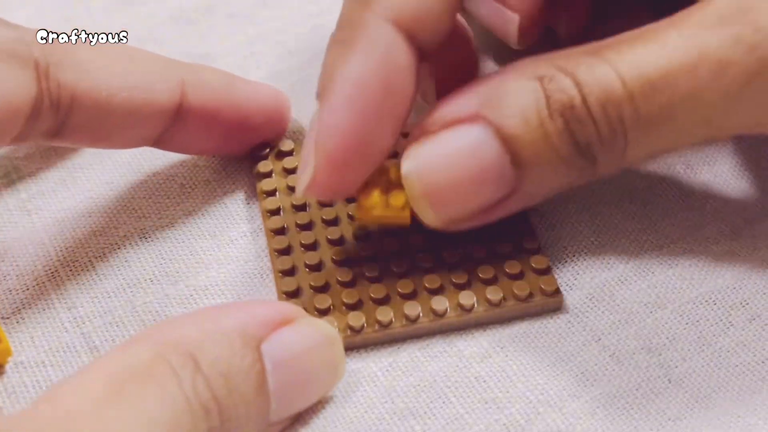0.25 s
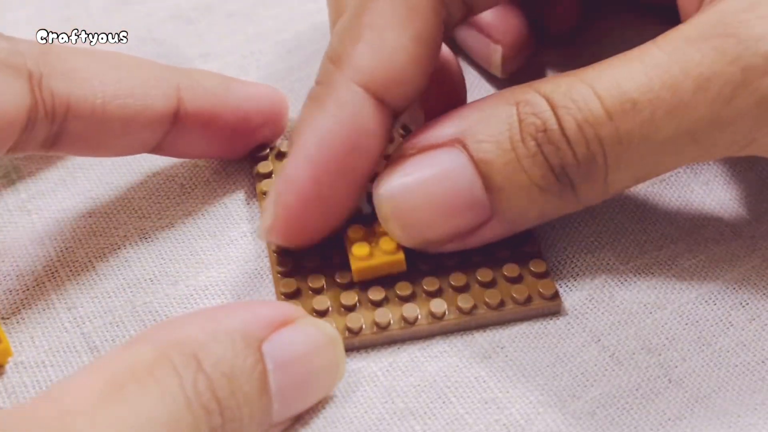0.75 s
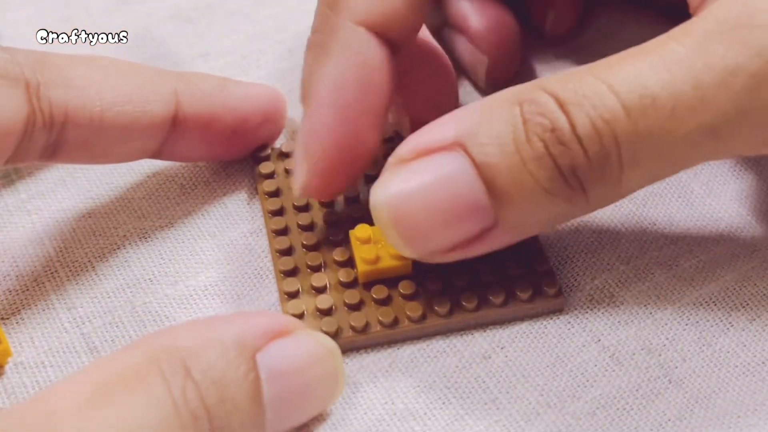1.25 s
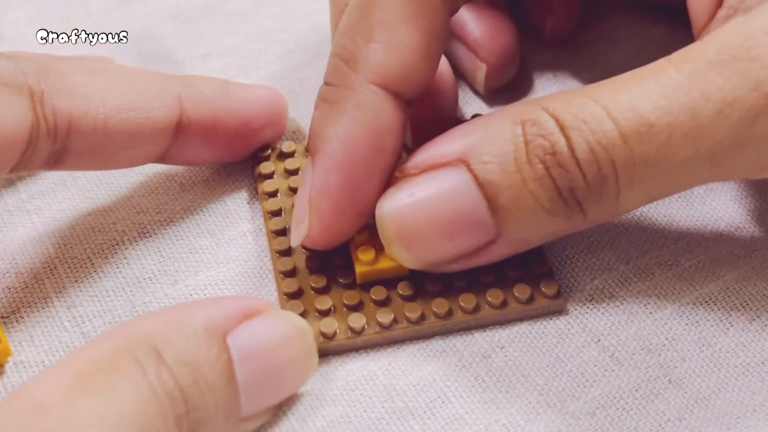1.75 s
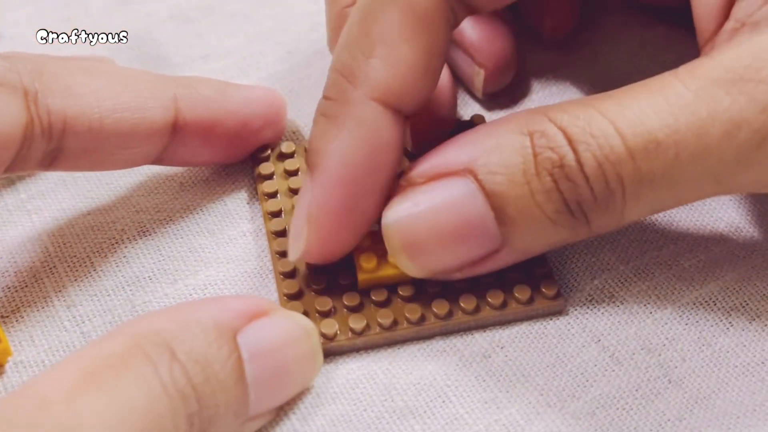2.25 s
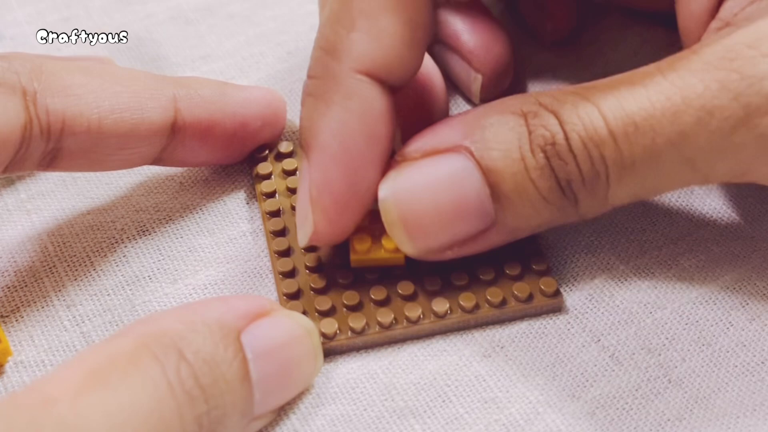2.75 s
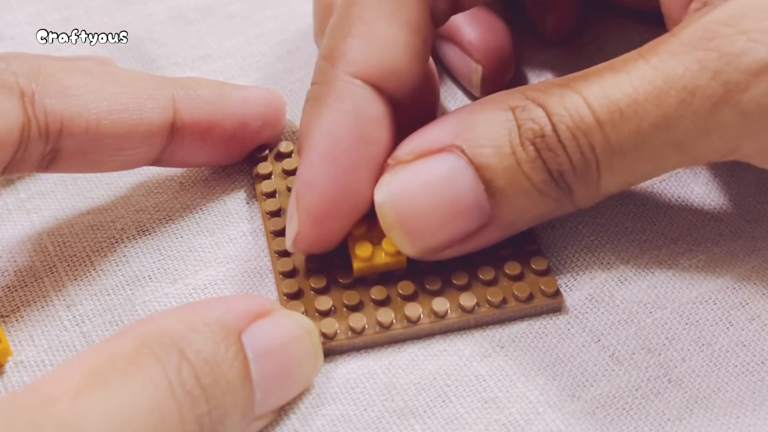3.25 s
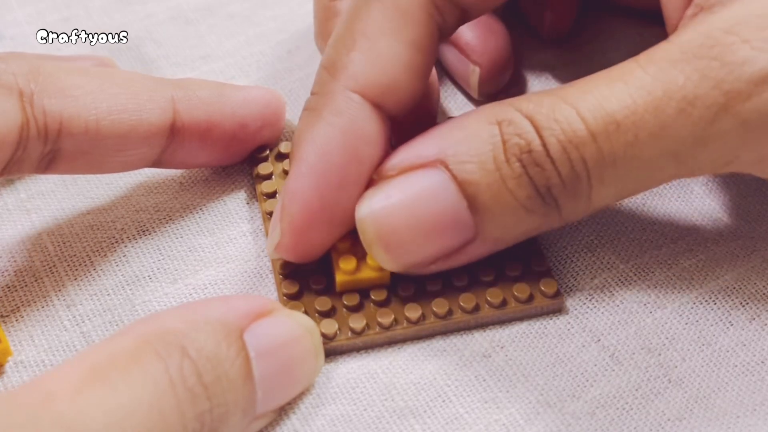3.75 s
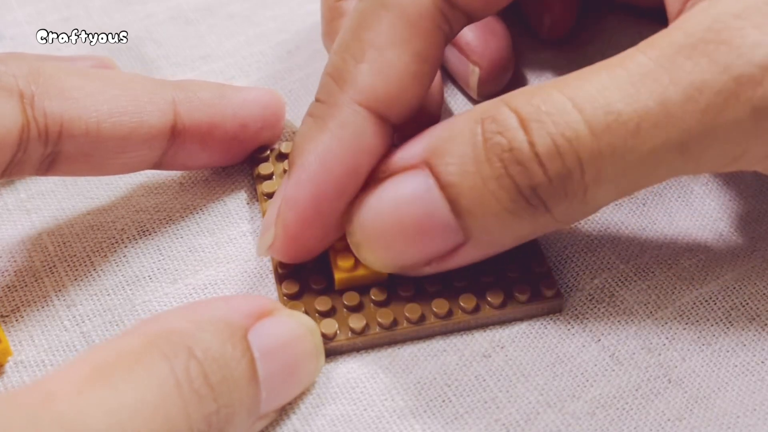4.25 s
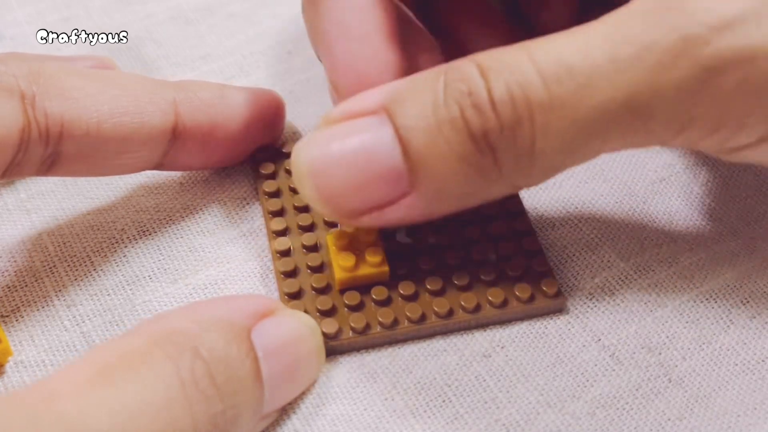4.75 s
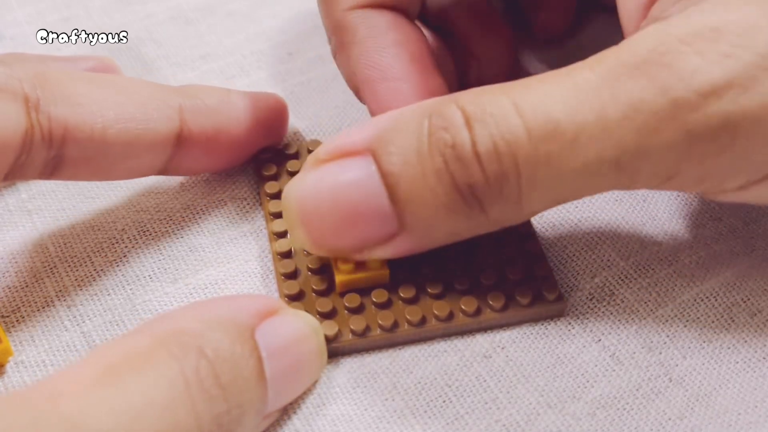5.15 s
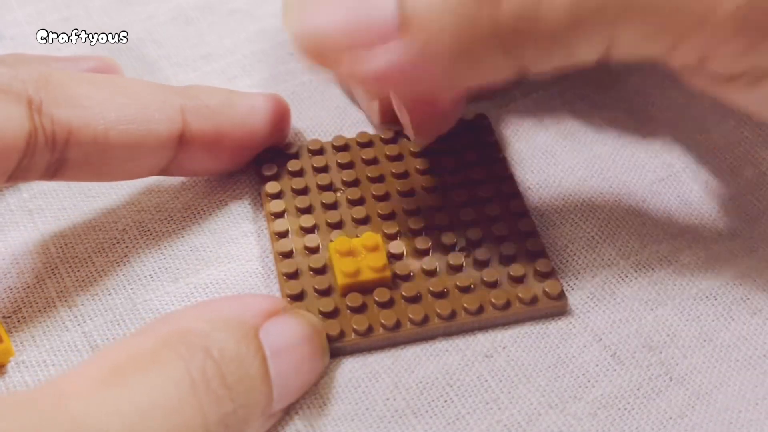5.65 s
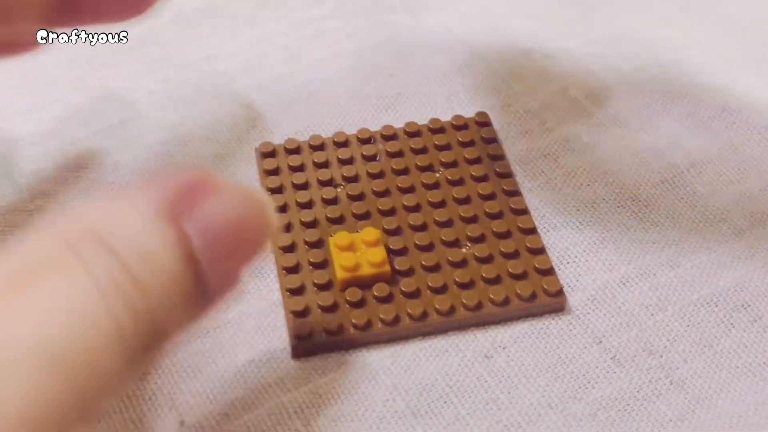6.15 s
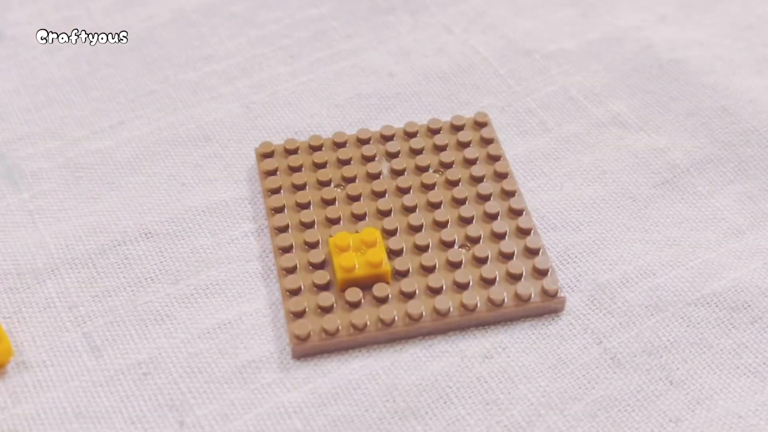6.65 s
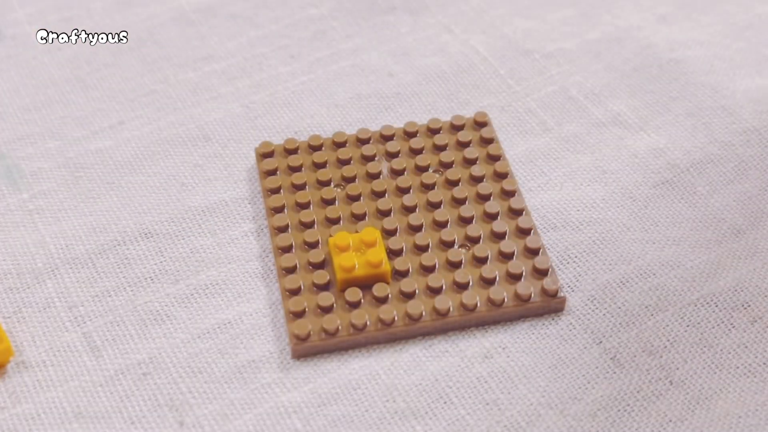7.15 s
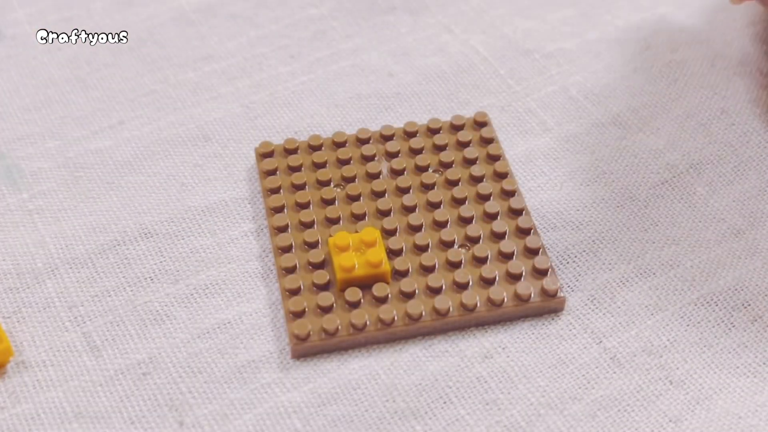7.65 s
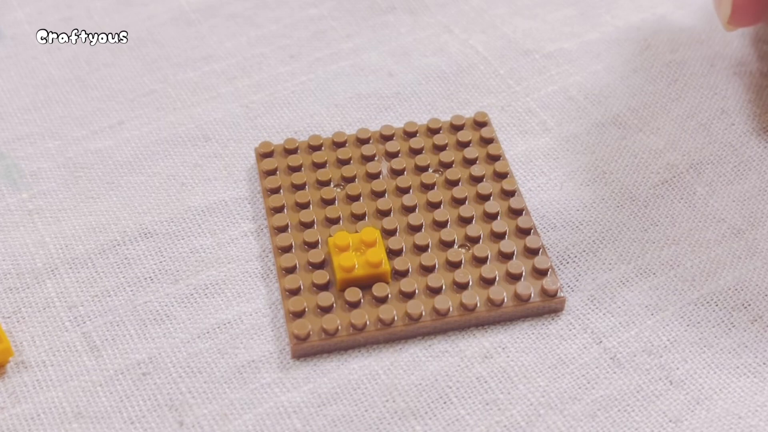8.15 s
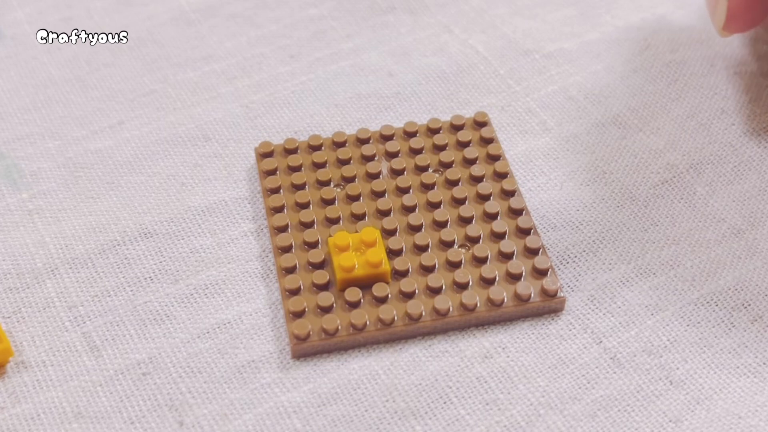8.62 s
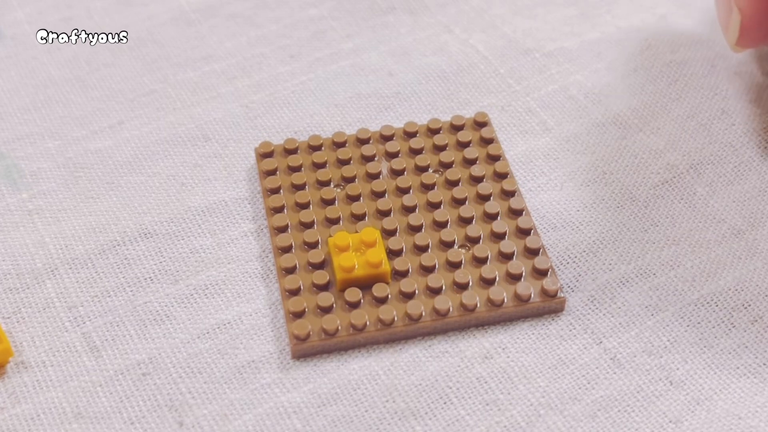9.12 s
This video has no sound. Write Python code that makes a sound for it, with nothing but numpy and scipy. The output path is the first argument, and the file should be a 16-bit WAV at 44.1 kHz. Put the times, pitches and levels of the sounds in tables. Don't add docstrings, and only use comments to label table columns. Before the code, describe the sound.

Throughout, an indoor bed of steady mains and fan hum, a faint compressor whine, slowly swelling low drones and soft ventilation rumble. At 0.05 s a soft deep table thud with a small tap and finger hiss; dry tiny plastic clicks at 0.45-0.6, then a rapid scraping stutter over studs at 0.72-0.77. At 1.34 clicks with a deep push; sparse faint ticks at 2.4, 3.1 and 3.6. From 4.1 light ticks and a short low push at 4.4. At 5.02-5.23 an even, brighter ratchet of about six clicks, then firm presses and a snap to 5.4. Cloth and sleeve brushing at 5.7-6.7 with faint ticks. Mostly hum and barely audible rustle until 9.03, when a soft thud and sharp knock land, a few-millisecond dip follows at 9.14, then a crisp double snap and brief rustle at 9.23-9.3. Close, dry stereo microphones.

```python
import sys
import numpy as np
from scipy import signal
from scipy.fft import rfft, irfft, next_fast_len
from scipy.io import wavfile
from scipy.ndimage import uniform_filter1d

SR = 44100
rng = np.random.default_rng(int(sys.argv[2]) if len(sys.argv) > 2 else 0)


def voltage_ratio(level):
    return 10 ** (np.asarray(level, float) / 20)


def unload_audio(sound):
    columns = np.transpose(np.atleast_2d(sound))
    steps = np.round(np.clip(columns, -1, 1) * 32767)
    wavfile.write(sys.argv[1], SR, steps.astype(np.int16))


N = 413658
TIME = np.arange(N) / SR
M = next_fast_len(N)
HZ = np.fft.rfftfreq(M, 1 / SR)

# f/Hz, lead/rad
PORT_LEAD = [(0, 0), (340, .35), (690, 2.5), (1210, 3), (1720, 6.6), (3200, 7.3), (4500, 6.9), (7500, 3.9),
             (8600, 3.0), (11000, .4), (13000, -.5), (15000, -3)]
# f/Hz, left minus right/dB
PORT_TILT = [(60, 1.5), (200, 2), (400, -2.5), (700, 4), (1300, -1), (2400, 6), (4400, 10), (7500, 1),
             (15000, 1)]


def along(table):
    f, v = np.transpose(table)
    return np.interp(np.log(HZ + 1), np.log(f + 1), v)


def noise(colour):
    return irfft(rfft(rng.standard_normal(M)) * voltage_ratio(along(colour)), M)[:N] * np.sqrt(SR / 2)


def ports(x):
    half = voltage_ratio(along(PORT_TILT) / 2) * np.exp(.5j * along(PORT_LEAD))
    return irfft(rfft(x, M) * np.array([half, 1 / half]), M)[:, :N]


def walk(rate_hz):
    k = int(SR / rate_hz)
    steps = np.repeat(rng.standard_normal(N // k + 1), k)
    return 0.66 * uniform_filter1d(uniform_filter1d(steps, k), k)[:N]


def ring(push, hz, t60_s):
    pole = np.exp(2j * np.pi * hz / SR - np.log(1000) / (t60_s * SR))
    y = signal.lfilter([1], [1, -pole], push).imag
    return y / np.abs(y).max()


def add(out, s, x):
    i = int(s * SR)
    out[i:i + len(x)] += x[:N - i]


def contacts():
    # t/s, peak level/dB, brick ring f/Hz, stud level/dB, edge level/dB
    settles = [(0.4471, -37, 3250, -16, -24), (0.5606, -51, 3400, -5, -14), (0.5765, -41, 3300, -18, -25),
               (.5828, -41.5, 3250, -13, -20), (0.5914, -57, 3600, -12, -10), (1.335, -54, 2900, -24, -14),
               (1.3421, -42, 2800, -6, -13), (1.3432, -46, 3700, -8, -14), (3.6364, -42, 2960, -9, -10),
               (1.4005, -50.5, 2900, -13, -24), (2.4217, -41.5, 3150, -20, -21),
               (2.5026, -56, 3220, -20, -25), (3.0854, -55, 3250, -16, -27), (3.6225, -51, 3150, -12, -15),
               (5.8398, -53.5, 4500, -3, -20), (.612, -62, 2600, -15, -8)]
    ratchet = [(.1619, -64, 2350, -15, -2), (0.218, -68, 2300, -8, 2), (.244, -72, 2300, -14, 2),
               (.2952, -72, 2300, -14, 2), (.6562, -63.5, 3400, 2, -4), (4.0912, -48.5, 2560, -25, -10),
               (4.0948, -62, 2500, -14, -2), (4.1052, -68, 2500, -14, 4), (4.483, -72, 2500, -20, 4),
               (4.782, -58.5, 2510, -30, -17), (4.856, -72, 2500, -20, 2), (4.984, -57, 2600, -18, -10),
               (5.0243, -43.5, 2850, -26, -11), (5.0632, -34, 2970, -28, -6),
               (5.106, -36.5, 2850, -10, -4.5), (5.141, -37.5, 2800, -16, -5), (5.1814, -33, 3080, -25, -9),
               (5.2252, -37, 3400, -10, -7), (5.4865, -59, 3120, -30, -17), (5.4996, -58.5, 2990, -28, -12),
               (5.8132, -52, 2430, -12, -14), (5.9202, -56, 2890, -23, -12), (6.3922, -58, 2390, -25, -7),
               (6.6983, -59.5, 2400, -27, -14)]
    knocks = [
        (.043, -41, 2700, -30, -35),
        (5.2272, -39, 3450, -9, -18),
        (5.344, -46, 2750, -32, -36),
        (9.017, -55, 2300, -14, -30),
        (9.0453, -35, 4200, -4, -13),
        (9.0476, -44, 3900, -25, -25),
    ]
    snaps = [
        (5.3953, -42.5, 3100, -8, -10),
        (6.107, -52, 2800, -4, -8),
        (9.2268, -41, 3000, -6, -13),
        (9.2288, -48, 3000, -7, -14),
    ]
    scrapes = [(.7255, -50, 3000, -20, -24), (.7286, -46, 3100, -18, -24), (.7322, -36, 3020, -18, -15),
               (.7352, -38, 3100, -10, -8), (.7374, -41, 3100, -12, -14), (.7402, -49, 3200, -14, -14),
               (.7462, -48, 3100, -10, -20), (.7478, -48, 3100, -16, -22), (.7525, -40, 3000, -16, -26),
               (.7544, -44, 3200, -16, -22), (.758, -46, 3300, -16, -24), (.7602, -41, 3050, -15, -24),
               (.7628, -47, 3100, -14, -22), (.766, -50, 3100, -16, -22), (.772, -57, 3000, -20, -26),
               (.7745, -58, 3100, -20, -26)]
    # stud-brick ring t60/s, plate level/dB, panel f/Hz, panel level/dB
    kinds = [
        (settles, (.0055, -17, 2100, -16)),
        (ratchet, (.007, -8, 930, -11)),
        (knocks, (.007, -3, 1500, -12)),
        (snaps, (.006, -12, 1950, -5)),
        (scrapes, (.007, -18.5, 2100, -20)),
    ]
    return [(*row, *traits) for table, traits in kinds for row in table]


def ticks():
    out, knock, t = np.zeros(N), np.zeros(N), TIME[:1024]
    rows = contacts()
    chance = rng.standard_normal((len(rows), 1024 + 14))
    tiny = signal.butter(3, 4300, "high", fs=SR, output="sos")
    broad = signal.butter(3, 1800, fs=SR, output="sos")
    for (s, db, hz, stud_db, edge_db, t60_s, plate_db, panel_hz, panel_db), c in zip(rows, chance):
        push = c[14:] * t / .0004 * np.exp(-t / 0.00048) * voltage_ratio(-2.5)
        push[16] += 3.5
        small = signal.butter(4, .7 * hz, "high", fs=SR, output="sos")
        sharp = signal.sosfilt(small, push)
        w = 1 + .03 * c[:14]

        brick = ring(sharp, hz, t60_s)
        brick -= voltage_ratio(-11) * ring(sharp, .84 * hz * w[0], .004)
        brick -= voltage_ratio(-3.5) * ring(sharp, 1.22 * hz * w[1], .005)
        brick += voltage_ratio(-9) * ring(sharp, 1.45 * hz * w[12], .003)

        stud = ring(sharp, 6300 * w[2], 0.0027)
        stud += voltage_ratio(-6.0) * ring(sharp, 5100 * w[3], 0.0032)
        stud += voltage_ratio(-3.0) * ring(sharp, 7400 * w[4], 0.0014)

        edge = ring(sharp, 11600 * w[5], 0.002)
        edge += voltage_ratio(-.5) * ring(sharp, 9300 * w[6], 0.0017)
        edge += voltage_ratio(-6) * ring(sharp, 13500 * w[7], 0.0021)
        edge += voltage_ratio(-20) * ring(sharp, 15000, .001)

        plate = ring(push, 800 * w[8], 0.016) + ring(push, 1050 * w[9], 0.015)
        plate += voltage_ratio(3.5) * ring(push, 1300 * w[10], 0.009)
        plate += voltage_ratio(-5) * ring(push, 1700 * w[11], 0.036)

        crack = voltage_ratio(-11) * sharp / np.abs(sharp).max()
        treble = signal.sosfilt(tiny, voltage_ratio(stud_db + 4.5) * stud + voltage_ratio(edge_db + 4.5) * edge)
        add(out, s, voltage_ratio(db) * (voltage_ratio(-2.5) * brick + crack + treble))
        add(knock, s + 0.0013, voltage_ratio(db + plate_db - 7.5) * signal.sosfilt(broad, plate))
        add(knock, s + .0003, voltage_ratio(db + panel_db) * ring(push, panel_hz * w[13], .009))
    tail = rng.standard_normal((2, 4096)) * voltage_ratio(-60 * TIME[:4096] / .08)
    room_tail = voltage_ratio(-50) * signal.fftconvolve(out[None], tail)[:, :N]
    return ports(out) + voltage_ratio(np.array([[2.5], [-2.5]])) * knock + room_tail


def thuds():
    # t/s, peak level/dB, f/Hz, t60/s, upper-mode share/dB
    pushes = [
        (.0452, -26.5, 121.7, 0.14, -9.5),
        (.1, -27, 109.5, 0.13, -23),
        (1.343, -27.5, 61, 0.17, -17.5),
        (4.393, -32.5, 66, 0.055, -15),
        (5.228, -34, 163, 0.096, -6.5),
        (5.3462, -36, 300, .04, -2),
        (5.3485, -30.5, 112, 0.11, -1),
        (5.395, -34.5, 126.5, 0.12, -5),
        (9.026, -30.5, 68, 0.14, -28),
        (9.046, -31.5, 114, 0.047, -7),
    ]
    out, push = np.zeros(N), np.zeros(8192)
    push[:24] = -np.hanning(24)
    band = signal.butter(3, [200, 1200], "band", fs=SR, output="sos")
    rattle = signal.sosfilt(band, rng.standard_normal((len(pushes), 8192)))
    for (s, db, hz, t60_s, upper_db), shake in zip(pushes, rattle):
        upper = ring(push, 2.59 * hz, .5 * t60_s)
        upper += voltage_ratio(1.5) * ring(push, 3.33 * hz, 0.14 * t60_s)
        upper += voltage_ratio(-8) * ring(push, 4.9 * hz, 0.17 * t60_s)
        upper += voltage_ratio(-4.5) * shake * voltage_ratio(-60 * TIME[:8192] / (2.5 * t60_s))
        add(out, s, voltage_ratio(db) * (ring(push, hz, t60_s) + voltage_ratio(upper_db) * upper))
    return ports(signal.sosfilt(signal.butter(2, 45, "high", fs=SR, output="sos"), out))


def rubbing():
    # f/Hz, level/dB
    airy = [(6500, -12), (8000, -3), (9500, -4.5), (11500, -1.5), (13000, -2.5), (14500, -1.5),
            (15600, -24.5)]
    # f/Hz, level/dB
    grainy = [(1500, -18), (2700, 1), (3600, -3), (5000, -3), (6500, 0), (7500, -2), (9000, -20)]
    # t/s,
    # hold/s, level/dB, grain over hiss/dB
    strokes = [(0, 0.15, -71.5, -11), (.216, 0.017, -76, -10), (.294, 0, -78, -25), (.47, .06, -90, -8),
               (.545, .005, -84, -15), (.57, .04, -84, -7), (.658, 0.0021, -79, 0), (.71, 0, -88, -12),
               (1.005, 0.031, -82, -20), (1.574, 0, -85, -20), (1.62, 0.026, -79, -20), (2.06, .2, -91, -11),
               (2.44, 0.013, -87, -20), (2.75, 0, -92, -13), (3.06, 0.075, -99, 4), (3.326, 0, -90, -20),
               (3.41, .03, -89, -8), (3.605, 0.048, -81.5, -12), (3.829, 0.023, -92, -17),
               (4.07, .02, -80, -14), (4.316, 0, -79, -24), (4.425, .07, -83, -20), (4.53, .05, -81, -20),
               (4.615, 0.035, -77, -2), (4.69, .02, -82, -18), (4.74, 0.07, -80, -18), (4.85, 0.05, -84, -15),
               (4.935, .01, -82, -12), (4.97, .06, -88, -12), (5.258, 0.055, -75.5, -5),
               (5.33, 0.041, -78, -22), (5.446, 0.012, -82, -9), (5.492, 0.059, -84, -16),
               (5.705, 0.1, -67, -8), (5.82, 0.04, -68, -3), (5.88, .06, -68, -7), (6.07, 0.045, -80, -10),
               (6.27, 0.047, -78, -3), (6.4, 0.053, -71.5, -7), (6.55, 0.096, -77, -3.5),
               (6.62, 0, -73, -5), (7.05, 0.11, -87.5, 6), (7.24, 0.05, -85, -2), (7.44, 0.082, -85.5, -5),
               (7.66, 0.025, -87, -12), (7.81, .02, -91.5, 6), (8.22, 0, -80, -3), (8.4, 0.03, -94.5, 12),
               (9.06, 0.16, -90.5, 13), (9.155, .065, -75.5, -8), (9.27, 0.016, -64.5, -6),
               (9.33, .05, -89, 4)]
    rise_db_per_s, fall_db_per_s = 452.5, 378.5
    shudder_db, shudder_db_per_s = -36, 450.5
    patchy_db = 4

    fidget_db = 5 * walk(11)
    hiss_db, grit_db = -104 + fidget_db, -108.5 + fidget_db
    for s, held_s, db, grain_db in strokes:
        before_db = rise_db_per_s * (s - TIME)
        after_db = fall_db_per_s * (TIME - s - held_s)
        stroke_db = db - np.maximum(np.maximum(before_db, after_db), 0)
        hiss_db = np.maximum(hiss_db, stroke_db)
        grit_db = np.maximum(grit_db, stroke_db + grain_db)
    grit = voltage_ratio(grit_db - 38.0)
    for s, db, *_ in contacts():
        add(grit, s, voltage_ratio(db - 37.0 + shudder_db - shudder_db_per_s * TIME[:8192]))
    flicker = voltage_ratio(3 * walk(150) + 3.2 * walk(30))
    hiss = voltage_ratio(hiss_db - 35.0) * noise(airy)
    grains = grit * noise(grainy)
    out = 0
    for x, split_hz in [(hiss, 11800), (grains, 4300)]:
        low = signal.sosfiltfilt(signal.butter(3, split_hz, fs=SR, output="sos"), x)
        tilt = voltage_ratio(patchy_db * walk(14))
        out = out + low * tilt + (x - low) / tilt
    return ports(flicker * out)


def tone(turns, hz, db, pan_db):
    lead = np.interp(hz, *np.transpose(PORT_LEAD))
    side = np.array([[.5], [-.5]])
    return np.sqrt(2) * voltage_ratio(db + side * pan_db) * np.sin(2 * np.pi * turns + side * lead)


def machines():
    # t/s, 35 x shaft f/Hz
    shaft_drift = [(0, 2039.1), (2.5, 2038.8), (5, 2038.5), (6.5, 2038.25), (8, 2038.5), (9.4, 2038.7)]
    multiples = [2, 3, 4, 9, 11, 14, 15, 18, 19, 20, 21, 22, 24, 25, 31, 32, 35, 36, 37]
    # rms level/dB, left minus right/dB, change once the hands leave/dB
    orders = [(-55, 2.5, -2.5), (-60.5, 7.5, 2.5), (-74.5, 0, 0.5), (-70.5, -13, 2), (-82.5, -1, -1),
              (-83.5, 1, -4.5), (-77.5, -0.5, -7), (-90, -0.5, 0), (-91, 4, 1), (-83.5, 6, 11),
              (-86.5, 8, 5), (-78.5, 2, -4.5), (-73.5, 0.5, -14.5), (-92.5, 2.5, -3.5), (-93.5, 0.5, 13.5),
              (-89, 6, 8.5), (-79.5, 3, 0), (-86, 4.5, -1.5), (-98.5, 5.5, -1)]
    hum_hz = [53.98, 59.2, 107.95, 120.0, 178.3, 181.82, 207.16, 222.05, 236.7, 240.02, 360.0, 480.04]
    # rms level/dB, left minus right/dB, start phase/turns
    hum = [(-57, 0, 0.35), (-64, 1.5, 0.33), (-58.5, 0.5, 0.26), (-63, -0.5, 0.56), (-60.5, 0, 0.25),
           (-66, 4.5, 0.16), (-71.5, -4.5, 0.036), (-76, 0, 0.86), (-69.5, 5.5, 0.52), (-46.5, 3.5, 0.35),
           (-72, -1, 0.25), (-72.5, -3.5, 0.33)]
    # t/s, lower level/dB, upper level/dB
    swell = [(0.0, -48.5, -49), (0.44, -43.5, -49.5), (1.12, -47.5, -57), (1.41, -43.5, -49),
             (1.72, -44, -67.5), (2.24, -46.5, -49.5), (3.19, -47, -71), (3.58, -50.5, -59),
             (3.86, -51, -72.5), (4.41, -55.5, -56.5), (4.65, -54, -74), (5.38, -49.5, -49),
             (5.8, -51.5, -66), (6.53, -48.5, -49), (7.23, -45.5, -50.5), (7.94, -45.5, -73.5),
             (8.96, -44.5, -70), (9.38, -47.5, -75)]
    swell_hz = (58.32, 92.05)
    hands_leave_s = (4.8, 8.4)

    bare = np.interp(TIME, hands_leave_s, [0, 1])
    s, high_hz = np.transpose(shaft_drift)
    shaft = np.cumsum(np.interp(TIME, s, high_hz) / 35) / SR
    mean_hz = shaft[-1] / TIME[-1]
    out = 0
    for k, (db, pan_db, bare_db) in zip(multiples, orders):
        order_db = db + bare_db * bare + 0.87 * walk(2.7)
        out = out + tone(k * shaft + rng.random(), k * mean_hz, order_db, pan_db)
    for hz, (db, pan_db, turns) in zip(hum_hz, hum):
        out += tone(hz * TIME + turns, hz, db, pan_db)
    s, *swell_db = np.transpose(swell)
    for hz, db in zip(swell_hz, swell_db):
        out += tone(hz * TIME, hz, np.interp(TIME, s, db) - .7, 0)
    return out


def air():
    # f/Hz, level/(dB per Hz)
    rumble = [(25, -92), (45, -72.5), (90, -71.5), (140, -74.5), (200, -78), (330, -79.5), (550, -87),
              (900, -92), (1500, -100), (2150, -106), (2500, -114), (4500, -121.5), (8000, -131),
              (14000, -131)]
    # f/Hz, likeness/0-1
    likeness = [(200, 0.95), (300, 0.7), (400, 0.74), (900, 0.49), (1300, 0.01), (2000, 0.4), (3000, 0.2),
                (6000, 0), (10000, 0.2)]
    alike = np.clip(along(likeness), 0, 1)
    shared = rfft(ports(noise(rumble)), M) * np.sqrt(alike)
    tilt = voltage_ratio(along(PORT_TILT) * np.array([[.5], [-.5]]))
    own = rfft(np.array([noise(rumble), noise(rumble)]), M) * np.sqrt(1 - alike) * tilt
    return voltage_ratio(0.99 * walk(2.09)) * irfft(shared + own, M)[:, :N]


def drop_faint(x):
    gates = [(0, 7300, 9100, -93), (0, 9100, 13400, -106), (0, 13400, 14500, -99), (0, 14500, 16500, -93),
             (1, 9600, 10400, -102), (1, 10400, 13400, -84), (1, 13400, 16500, -98)]
    pair = np.array([x[0] + x[1], x[0] - x[1]]) / 2
    f, _, z = signal.stft(pair, SR, nperseg=1024)
    band_power = np.add.reduceat(np.abs(z) ** 2, np.arange(0, 513, 16), axis=1)
    power = np.repeat(band_power, 16, axis=1)[:, :513] * 4 / 3
    need = np.zeros((2, 513))
    for which, lo_hz, hi_hz, db in gates:
        need[which, (f > lo_hz) & (f <= hi_hz)] = voltage_ratio(db) ** 2
    treble = power[:, f > 5000].sum(axis=(0, 1))
    calm = treble < 12 * np.maximum(np.roll(treble, 2), np.roll(treble, -2))
    faint = z * (power < need[:, :, None]) * calm
    mid, side = pair - signal.istft(faint, SR, nperseg=1024)[1][:, :N]
    return np.array([mid + side, mid - side])


def scene():
    return ticks() + thuds() + rubbing() + machines() + air()


def low_pass(x):
    return signal.sosfilt(signal.butter(12, 16150, fs=SR, output="sos"), x)


def record(dry):
    gap_s = (9.138, 9.1415, 9.1455)
    start_s, quiet_s, back_s = gap_s
    gain = np.interp(TIME, [start_s, quiet_s, back_s, back_s + .0004], [1, .08, .08, 1])
    mix = drop_faint(dry * uniform_filter1d(gain, size=8))
    return low_pass(mix)


dry = scene()
out = record(dry)
unload_audio(out)
```